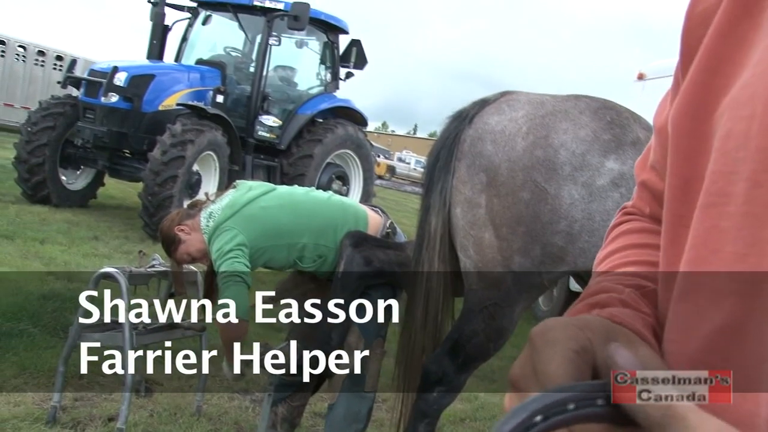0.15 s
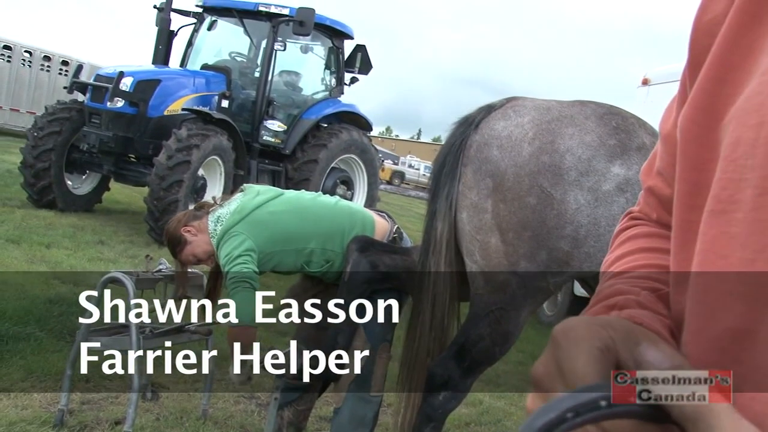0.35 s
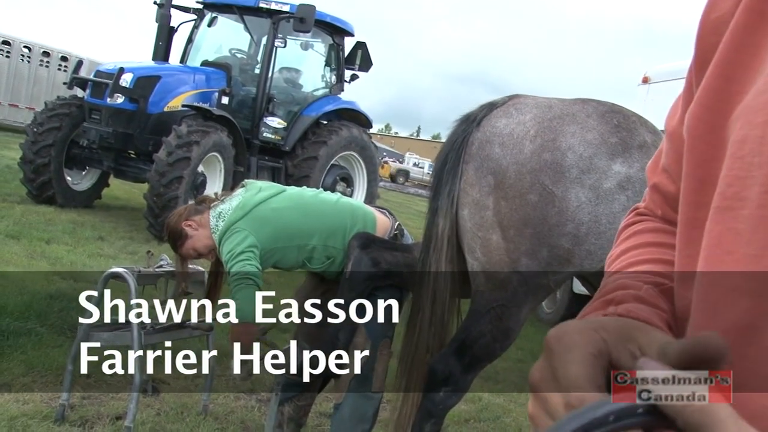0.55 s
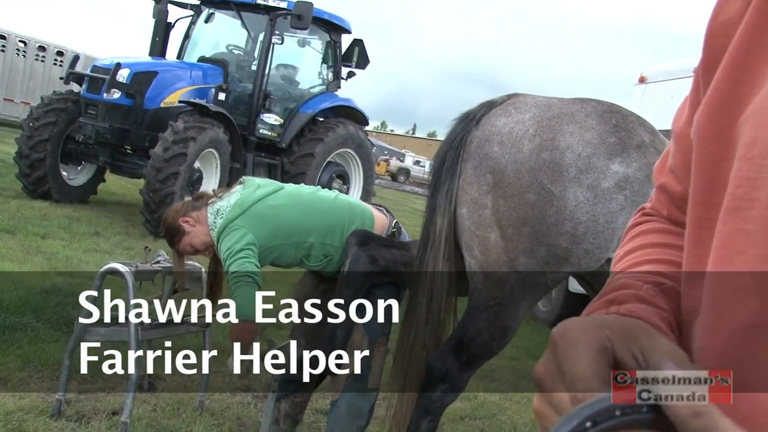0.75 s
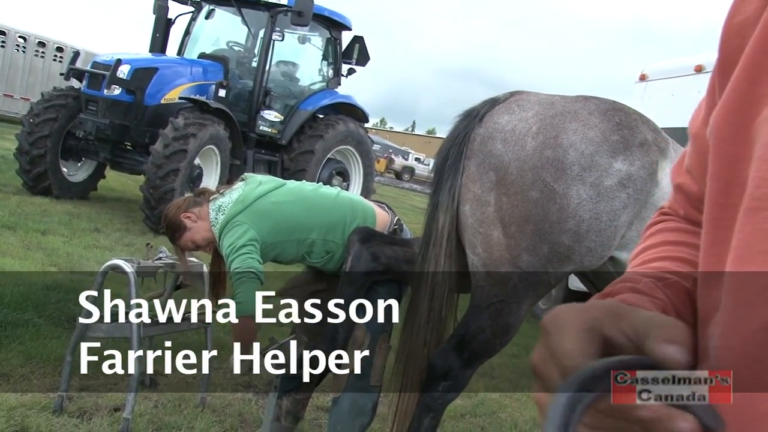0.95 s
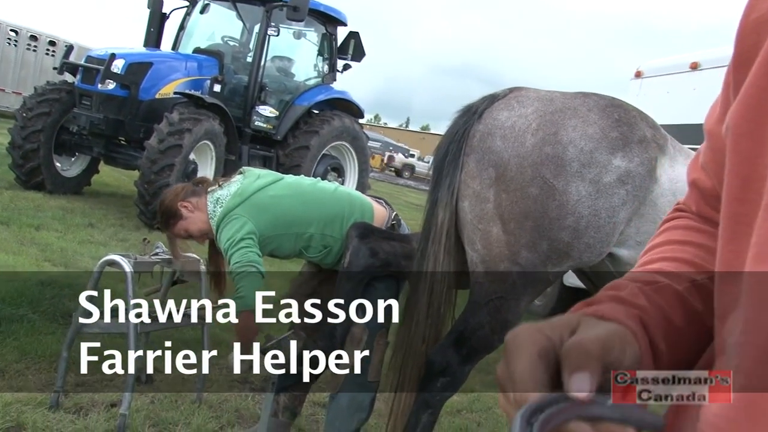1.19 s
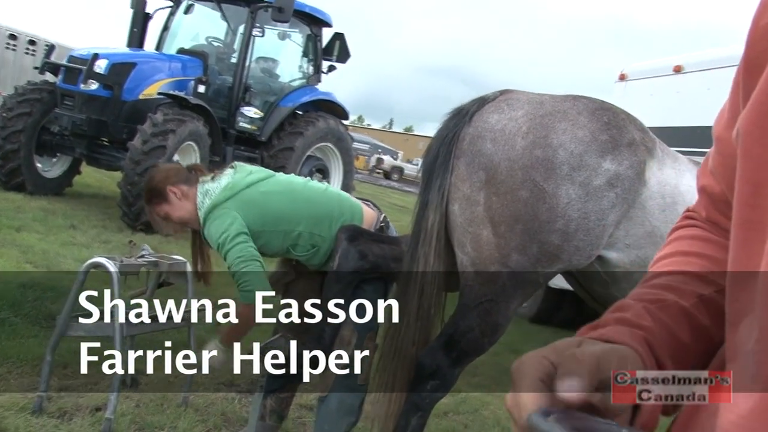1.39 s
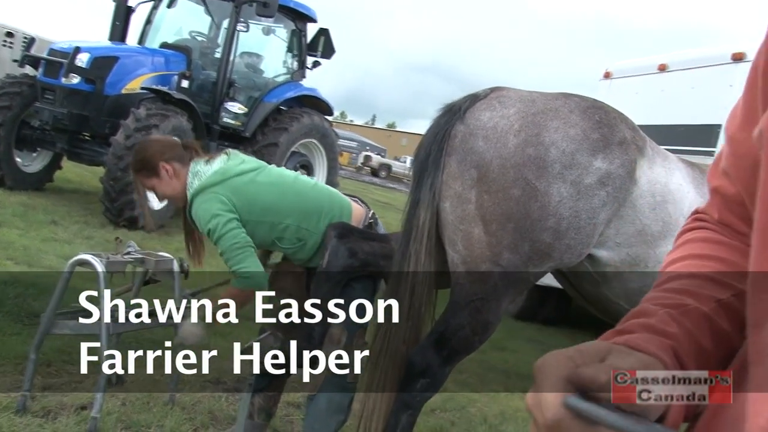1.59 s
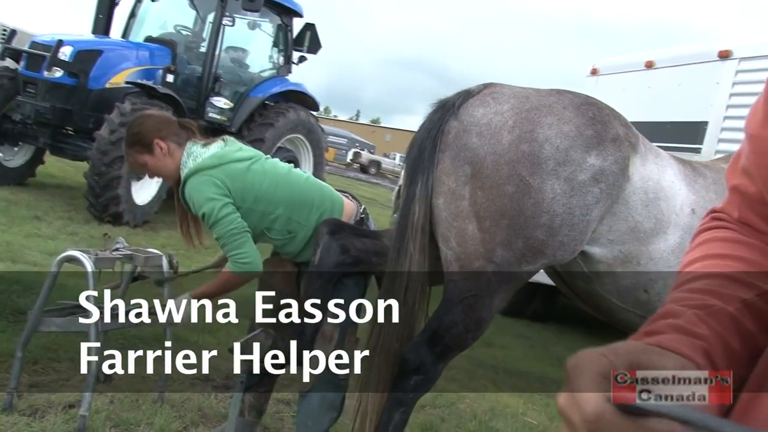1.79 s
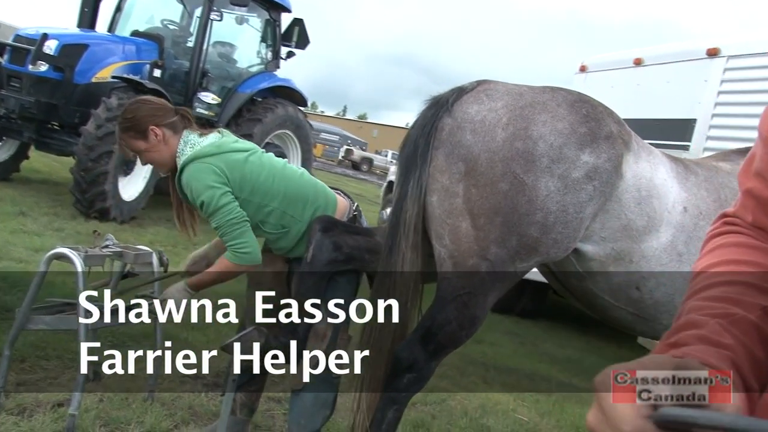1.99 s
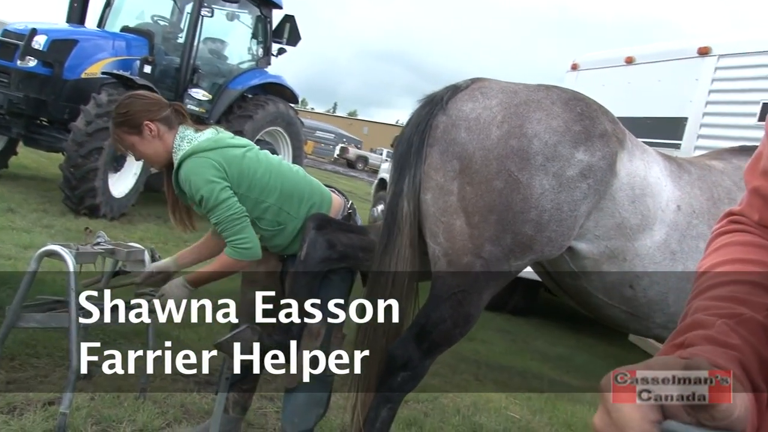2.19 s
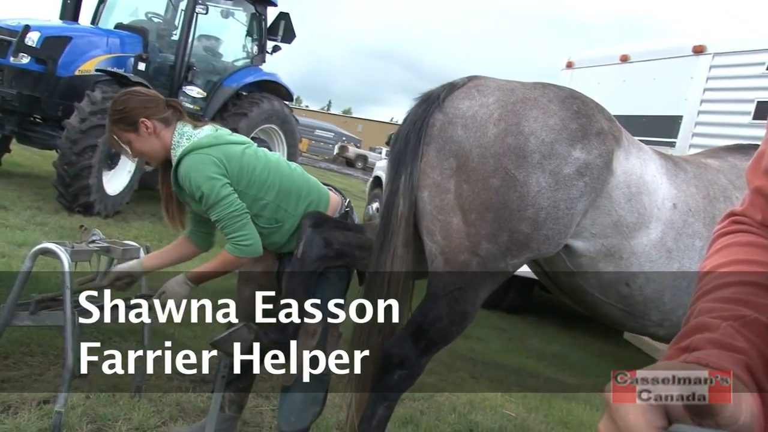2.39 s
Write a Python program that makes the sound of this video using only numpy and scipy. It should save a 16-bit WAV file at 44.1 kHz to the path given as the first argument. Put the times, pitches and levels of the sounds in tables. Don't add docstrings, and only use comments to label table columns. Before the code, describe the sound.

Loud metallic hammer strikes ring out in steady rhythm outdoors, followed by a quieter tool clatter

```python
import sys
import numpy as np
from scipy import signal
from scipy.fft import rfft, irfft, next_fast_len
from scipy.io import wavfile
from scipy.ndimage import map_coordinates

SR = 44100
rng = np.random.default_rng(int(sys.argv[2]) if len(sys.argv) > 2 else 0)


def undo_db(level):
    steps = np.asarray(level, float) / 20
    return 10 ** steps


def materialize(psi):
    bounded = np.clip(np.atleast_2d(psi).T, -1, 1)
    quanta = np.round(bounded * 32767).astype(np.int16)
    wavfile.write(sys.argv[1], SR, quanta)


N = 108045
TIME_S = np.arange(N) / SR


def unit(x):
    return x / np.sqrt(np.mean(x ** 2) + 1e-20)


def along(points, hz):
    f, v = np.transpose(points)
    return np.interp(np.log(hz + 1), np.log(f + 1), v)


def curve(rows):
    s, v = np.transpose(rows)
    return np.interp(TIME_S, s, v)


def wobble(rate):
    knots = rng.standard_normal(int(N * rate / SR) + 4)
    return map_coordinates(knots, [np.arange(N) * rate / SR])


def noise(n, response):
    m = next_fast_len(n + 2048)
    spectrum = rfft(rng.standard_normal((2, m))) * response(np.fft.rfftfreq(m, 1 / SR))
    return unit(irfft(spectrum, m)[:, :n])


def coloured(n, points):
    return noise(n, lambda hz: undo_db(along(points, hz)))


def blend(pair, alike):
    u = np.arccos(np.clip(alike, 0, 1)) / 2
    common, apart = np.cos(u) * pair[0], np.sin(u) * pair[1]
    return np.array([common + apart, common - apart])


def sides(pan_db):
    return undo_db(np.array([[pan_db / 2], [-pan_db / 2]]))


def split(lead):
    return lead * np.array([[.5], [-.5]])


def mode(t, hz, db, t60, pan_db, lead, start=0, glide=0):
    phase = 2 * np.pi * (hz + glide * t / 2) * t + start + split(lead)
    return undo_db(db - 60 * t / t60) * sides(pan_db) * np.sin(phase)


def add(out, s, x):
    part = out[:, round(s * SR):][:, :x.shape[1]]
    part += x[:, :part.shape[1]]


def room(x, decay):
    hz, t, z = signal.stft(rng.standard_normal((2, SR // 4)), SR, nperseg=256)
    t60 = along(decay, hz)[:, None]
    tail = signal.istft(z * undo_db(-60 * t / t60), SR, nperseg=256)[1]
    return signal.fftconvolve(x, tail / np.linalg.norm(tail[0]), axes=1)[:, :x.shape[1]]


def after_change():
    return np.clip((TIME_S - 1.568) / 0.0016 + .5, 0, 1)


# frequency_hz, level_db (per Hz)
AIR_BEFORE = [(12, -61), (20, -27), (81, 0), (182, -15), (277, -15), (923, -34), (1530, -38), (12100, -54),
              (16000, -69)]
AIR_AFTER = [(12, -62), (20, -22.5), (70, -0.5), (127, -16), (158, -8), (222, -18.5), (285, -20),
             (422, -26), (16000, -62.5)]
# frequency_hz, likeness (0-1)
ALIKE = [(60, 0.94), (400, 0.92), (2000, 0.97), (8000, 0.18)]


def open_air():
    late, out = after_change(), 0
    for colour, db, share in ((AIR_BEFORE, -36, 1 - late), (AIR_AFTER, -50.5, late)):
        own = coloured(N, colour)
        common = noise(N, lambda hz: undo_db(along(colour, hz)) * along(ALIKE, hz))
        out = out + share * undo_db(db + wobble(0.76)) * unit(own + common[0]) * sides(-4.5)
    return out


# pitch_hz, width_hz, before_db, after_db, left_lead_rad, left_right_db
ENGINE = [(77.3, 12, -40, -52.5, 1, -4.5), (155.9, 23, -51, -58, -0.64, -1), (277.2, 10, -48.5, -62, -1, 0)]
# time_s, level_db
LOAD = [(0, 5.5), (.4, 3), (.9, -1), (1.35, 2.5), (1.6, 4), (2.0, -1), (2.45, -5)]


def engine():
    late, out = after_change(), 0
    throb_hz, throb_db = 12, 1.5
    throb = np.cos(2 * np.pi * throb_hz * TIME_S + 0.44 * wobble(1.7) - 1.5)
    load_db = curve(LOAD)
    for hz, width, db, late_db, lead, pan in ENGINE:
        drift = np.cumsum(width / 3 * wobble(12)) * 2 * np.pi / SR
        tone = np.sin(2 * np.pi * hz * TIME_S + drift + split(lead)) * np.sqrt(2)
        level_db = db + (late_db - db) * late + load_db
        level_db = level_db + throb_db * throb * 76 / hz + 2.2 * wobble(11)
        out = out + undo_db(level_db) * tone * sides(pan)
    return out


# order, level_db
WHINE = [(1, -64.5), (2, -74), (3, -75.5), (4, -81), (5, -84.5), (6, -77.5), (7, -81.5), (8, -73), (9, -83),
         (10, -84)]


def tape_drive():
    whine, unrest_db = 0, 1.8
    for order, db in WHINE:
        tone = np.sin(2 * np.pi * order * 1500 * TIME_S + order * order)
        whine = whine + undo_db(db + 5.5 + unrest_db * wobble(60)) * tone
    return whine * undo_db(-17 * after_change()) * sides(-2)


HEAD_HZ = [6052, 6352, 9189]
# t60_s, left_right_db, left_lead_rad
HEAD = [(0.044, -5, 1.12), (0.051, 8.5, 0.74), (0.047, -5.5, 0.79)]


def head_modes(t, head_db, hold_s):
    x = 0
    for hz, (t60, pan, lead), db in zip(HEAD_HZ, HEAD, head_db):
        x = x + mode(t, hz, db, t60, pan, lead)
    return x * undo_db(-11 * (t / hold_s) ** 2)


# time_s, level_db
RINGS = [
    [(0.226, -31), (0.242, -20.5), (0.282, -33), (0.342, -43), (0.372, -62), (0.43, -69.5)],
    [(0.466, -13), (0.478, -14), (0.508, -12), (0.536, -30.5), (0.586, -29), (0.662, -69), (0.68, -63.5)],
    [(0.717, -37.5), (0.741, -40.5), (0.855, -46), (0.905, -87), (0.935, -73.5)],
    [(0.975, -27), (0.999, -23), (1.015, -22), (1.031, -42), (1.073, -26), (1.099, -37), (1.127, -50),
     (1.169, -53), (1.19, -59.5)],
    [(1.226, -24.5), (1.248, -15), (1.302, -31.5), (1.342, -32), (1.435, -63.5)],
    [(1.47, -26), (1.508, -35), (1.53, -27), (1.564, -35.5)],
]


def rebound_ring(t, s, ring):
    ring_hz, twin_hz, fade_t60 = 10418, 52, .12
    ring_db = np.interp(s + t, *np.transpose(ring)) + 7 + 2.2 * wobble(35)[:len(t)]
    ring_db -= 60 * np.clip(s + t - ring[-1][0], 0, 1) / fade_t60
    main = mode(t, ring_hz, ring_db, np.inf, -5, 0.39, glide=200)
    return main + mode(t, ring_hz + twin_hz, ring_db - 15, np.inf, 0, 1.7)


LEFT_LAG = 7
# pitch_hz, level_db, t60_s, group (whole part picks the LANDING level)
STAND = [(1071, -8, .02, 0), (1928, -10, 0.018, 2.5), (5360, -8.5, .018, 2), (5648, -6.5, 0.016, 1.5),
         (2843, -13.5, 0.015, -2), (3430, -22, 0.025, 2.5), (4845, -11.5, .02, 2.5), (5180, -3, 0.019, 1),
         (5525, -7.5, 0.018, 2.5), (5898, -7.5, 0.0095, 1.5), (11070, -15, .03, 3),
         (12430, -14, 0.011, 2.5), (13140, -17, .04, 3), (14850, -12, .05, 3)]


def stand_modes(t, group_db, stretch):
    luck, x = rng.standard_normal((len(STAND), 3)), 0
    for (hz, db, t60, group), (tune, level, pan) in zip(STAND, luck):
        level_db = db + group_db[int(group)] + level
        lead = -2 * np.pi * hz * LEFT_LAG / SR
        x = x + mode(t, hz * (1 + .004 * tune), level_db, t60 * stretch, 2 * pan, lead)
    return x


# frequency_hz, level_db
CRACK = [(200, -2), (1000, -8), (3000, -5.5), (5600, -6.5), (8000, 5), (12000, -38), (16000, -32.5),
         (21000, -34.5)]


def crack_burst(n):
    burst = blend(coloured(n, CRACK), .7)
    return np.array([np.roll(burst[0], LEFT_LAG), burst[1]])


# frequency_hz, level_db
SLAP_COLOUR = [(1500, -3), (3000, 26.5), (6000, 27.5), (8000, 23.5), (9300, 15), (10000, -30),
               (14000, -53.5)]


def wall_slap(x, t, db, t60):
    m = SR // 20
    slap = unit(room(x, [(100, t60)])[:, :m]) + .45 * coloured(m, SLAP_COLOUR)
    slap = unit(irfft(rfft(slap) * undo_db(along(SLAP_COLOUR, np.fft.rfftfreq(m, 1 / SR))), m))
    swell = 1 - np.exp(-t[:m] / 0.001)
    return undo_db(db - 60 * t[:m] / t60) * swell * slap * sides(-10.5)


# start_s, low_head_db, twin_head_db, upper_head_db
BLOWS = [
    (0.2217, 15.5, 6, 9.5),
    (.461, 5.5, 9, 8),
    (0.7126, 13, 12.5, 6.5),
    (0.9703, 0.5, -6.5, 6),
    (1.2214, -1, -15.5, 6.5),
    (1.4651, 3, 10, 17.5),
]
# crack_db, thump_db, damping_time_s, bright_db, bright_t60_s
CONTACT = [(2, -34, 0.049, -11, 0.14), (3, -40, 0.018, -9.5, 0.18), (3, -26, 0.018, -6, 0.064),
           (3, -37.5, 0.034, -14.5, 0.077), (3, -33.5, 0.043, -12.5, 0.058), (3, -15, 0.015, -12.5, .035)]
# low_db, middle_db, broad_5khz_db, top_db, t60_stretch
LANDING = [(7.5, -3, 3.5, -9.5, 0.89), (6, 9, 6, -3, 1), (5, 0.5, 17.5, -16, 1.4),
           (-11.5, 3, 13, 5.5, 1.38), (4.5, 10, 10, -7, 0.89), (8.5, 13, 17, -19, 0.97)]
# frequency_hz, level_db
WASH = [(200, -20), (1650, -4), (1940, 9), (2250, -3), (6000, -2), (8000, -16), (12000, -34), (16000, -50)]
# frequency_hz, t60_s
GROUND = [(300, .08), (2000, .14), (6500, .15), (8000, .05), (12000, .022)]
# delay_s, level_db, t60_s
SLAPS = [
    (0.103, -45, 0.17),
    (0.165, -61, 0.28),
]
# time_s, level_db
CHANGE = [(1.5675, 0), (1.569, -28), (1.578, -28), (1.5785, -8), (1.58, -50), (1.6, -120)]


def hammer():
    out, t = np.zeros((2, N)), np.arange(SR // 2) / SR
    for blow, contact, landing, ring in zip(BLOWS, CONTACT, LANDING, RINGS):
        s, *head_db = blow
        crack_db, thump_db, hold_s, bright_db, bright_t60 = contact
        *group_db, stretch = landing
        x = head_modes(t, head_db, hold_s) + rebound_ring(t, s, ring)
        swing_db = 14 * (t / .2) ** 2 * 2
        x += mode(t, 12096, bright_db - swing_db, bright_t60, -3.4, 0.51)
        x += mode(t, 284.7, thump_db - 6.5, 0.048, 0, 0)
        x += mode(t, 40, thump_db, .05, 8, 1.0)
        x += stand_modes(t, group_db, stretch)
        burst = crack_burst(len(t))
        wash = blend(coloured(len(t), WASH), 0.18)
        crack = burst * undo_db(-60 * t / .017) + wash * undo_db(-31 - 60 * t / 0.17)
        x += undo_db(crack_db + 3.5) * crack
        x *= 1 - np.exp(-t / 0.000047)
        add(out, s, x + undo_db(-27) * room(x, GROUND))
        lead_s = 0.004
        tick = t[t < lead_s]
        add(out, s - lead_s, undo_db(-22.5) * burst[:, -len(tick):] * tick / lead_s)
        for delay, db, t60 in SLAPS:
            add(out, s + delay, wall_slap(x, t, db, t60))
    return out * undo_db(curve(CHANGE))


# frequency_hz, level_db
BOX_NOISE = [(150, -70), (300, -30), (500, -9), (1400, 0), (4000, -10), (8000, -19), (16000, -42)]
# time_s, level_db
RUSTLE = [(1.9, -85.5), (1.97, -54), (2.1, -48.5), (2.22, -68.5), (2.3, -72.5), (2.45, -79.5)]


def settling():
    rustle = blend(coloured(N, BOX_NOISE), .6)
    return rustle * undo_db(curve(RUSTLE) + 3 * wobble(65)) * sides(-2.5)


# start_s, peak_db, right_left_db (half of it applied)
CLINK = [
    (1.9256, -22.5, 11),
]
# pitch_hz, level_db, t60_s
TOOL = [(640, -3, 0.04), (1135, -1, 0.025), (2715, 2, 0.053), (3940, -10.5, .12), (5330, 5, 0.047),
        (5806, 3.5, 0.035), (5970, -8, 0.11), (6510, -3.5, 0.11), (9505, -16.5, 0.15), (10600, -18, 0.12),
        (12300, -20, 0.04), (13060, -12, .06)]


def clink():
    out, t = np.zeros((2, N)), np.arange(SR // 4) / SR
    for s, db, pan in CLINK:
        for k, (hz, level, t60) in enumerate(TOOL):
            add(out, s, mode(t, hz, db - 8.5 + level, t60, -pan / 2, k))
        add(out, s, undo_db(db - 14.5 - 60 * t / 0.073) * coloured(len(t), WASH))
    return out


# start_s, peak_db, left_right_db, brightness_db_per_octave, t60_s, hollow_modes_db
KNOCKS = [(1.9673, -3, -2.5, 0, 0.035, 0.5), (1.992, -21, 2.5, -1.5, 0.034, 5), (2.009, -35, 4, -8, .03, 6),
          (2.046, -17.5, -3, 2, 0.047, 8.5), (2.066, -14.5, -4.5, 1.5, 0.02, 9.5),
          (2.079, -23.5, -5, -0.5, 0.067, -3), (2.092, -34.5, 8, -10, 0.025, 1),
          (2.106, -27, -5, -0.5, 0.038, 3), (2.152, -29.5, -3, -4, 0.042, 3),
          (2.16, -41, -1, -4.5, 0.02, 10), (2.189, -48, -6.5, -9, 0.03, 2),
          (2.204, -41.5, -1, -10, 0.022, -2), (2.329, -49, -3.5, -6.5, 0.033, 5)]
# pitch_hz, level_db, t60_s
BOX = [(484, -11, 0.043), (686, -9.5, 0.056), (986, -7, 0.034), (1284, -20.5, 0.27), (1393, 4.5, 0.017),
       (1837, 2.5, 0.019), (2290, -13, 0.035), (2690, -9.5, 0.037), (3480, -33, 0.038), (4460, -23, 0.023),
       (5380, -13.5, 0.023), (7580, -14.5, 0.029)]


def tool_box():
    out, t = np.zeros((2, N)), np.arange(SR // 4) / SR
    hollow_hz = 800
    for s, db, pan, tilt_db, t60, hollow_db in KNOCKS:
        luck, ring = rng.standard_normal((len(BOX), 2)), 0
        for (hz, level, mode_t60), (tune, loud) in zip(BOX, luck):
            level_db = level - 5 + 2 * loud + hollow_db * (hz < hollow_hz) + tilt_db * np.log2(hz / 1400)
            ring = ring + mode(t, hz * (1 + 0.0136 * tune), level_db, mode_t60, 0, 0.25)

        def colour(hz):
            octaves = np.log2(np.maximum(hz, hollow_hz / 2) / 1400)
            return undo_db(along(BOX_NOISE, hz) + tilt_db * octaves)

        burst = blend(noise(len(t), colour), 0.58)
        x = ring + burst * undo_db(-4 - 60 * t / t60)
        x = undo_db(db - 3.5) * x * sides(pan) * (1 - np.exp(-t / 0.00073))
        add(out, s, x + undo_db(-15.5) * room(x, GROUND))
    return out


def lagged(x, s):
    k = np.exp(-1 / (s * SR))
    return signal.lfilter([1 - k], [1, -k], x)


def scene():
    return open_air() + engine() + tape_drive() + hammer() + settling() + clink() + tool_box()


def low_pass(x):
    return signal.sosfilt(signal.butter(12, 20000, fs=SR, output="sos"), x)


def record(dry):
    clip_top, hardness = 1, 58
    x = dry / (1 + np.abs(dry / clip_top) ** hardness) ** (1 / hardness)
    attack_s, release_s, duck_db = 0.013, 0.058, 11
    overload = np.abs(x).mean(axis=0) > clip_top * .75
    charge = lagged(lagged(lagged(overload, attack_s), attack_s), release_s)
    x = x * undo_db(-duck_db * charge / charge.max())
    hz = np.fft.rfftfreq(N, 1 / SR)
    shelf_db = -21.5 / (1 + np.exp((16000 - hz) / 50))
    x = irfft(rfft(x) * undo_db(shelf_db), N)
    return low_pass(x)


dry = scene()
out = record(dry)
materialize(out)
```